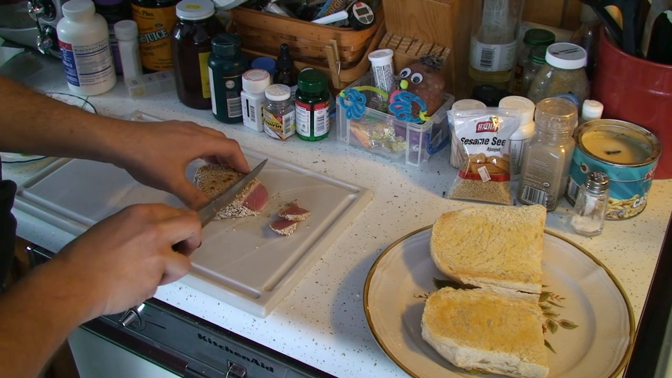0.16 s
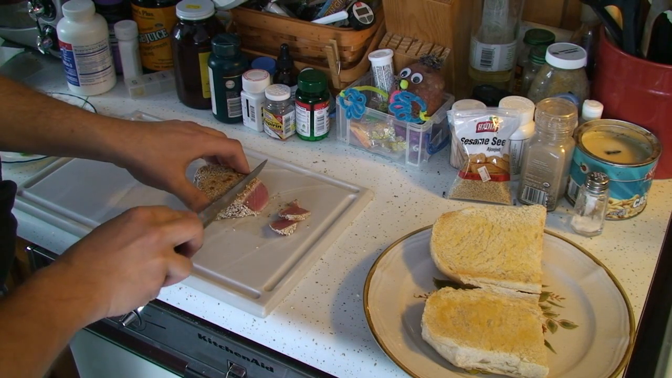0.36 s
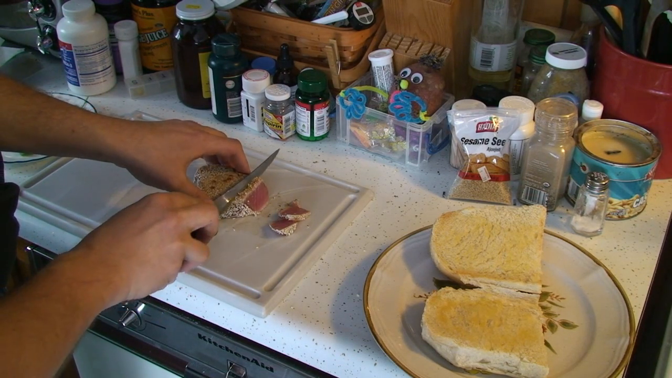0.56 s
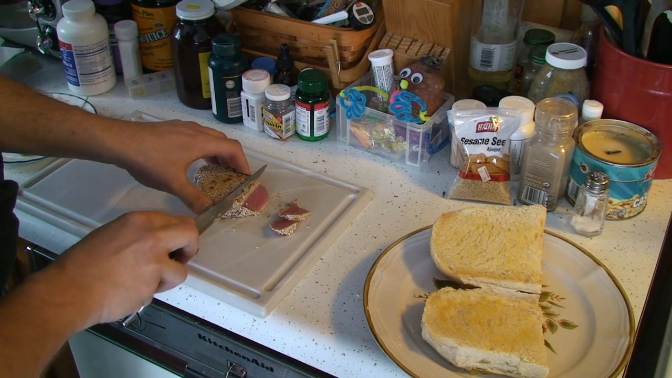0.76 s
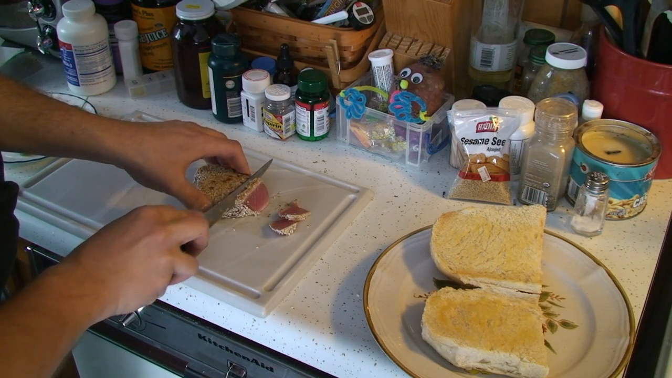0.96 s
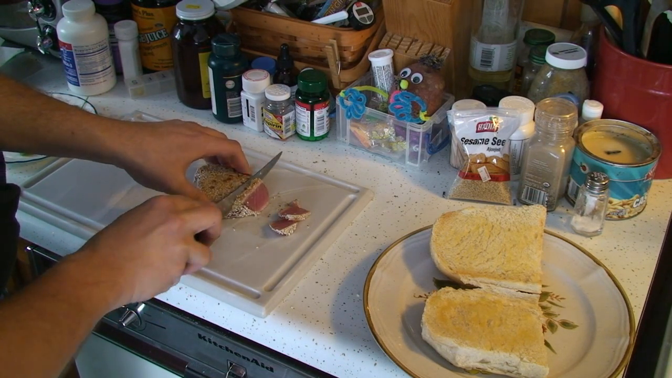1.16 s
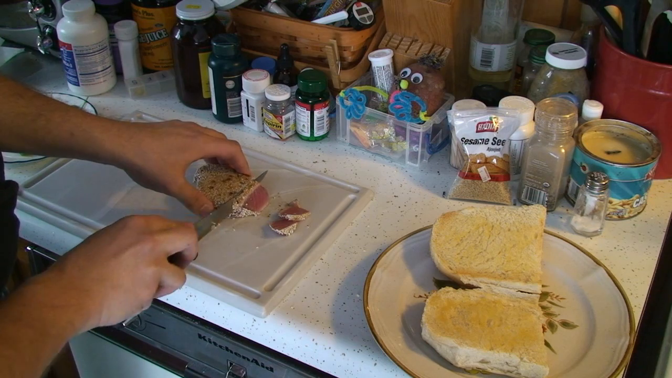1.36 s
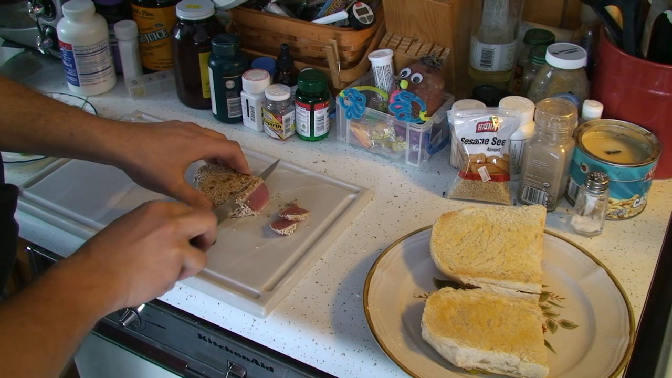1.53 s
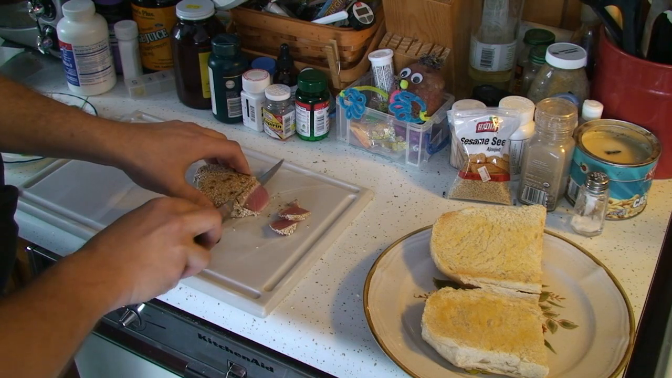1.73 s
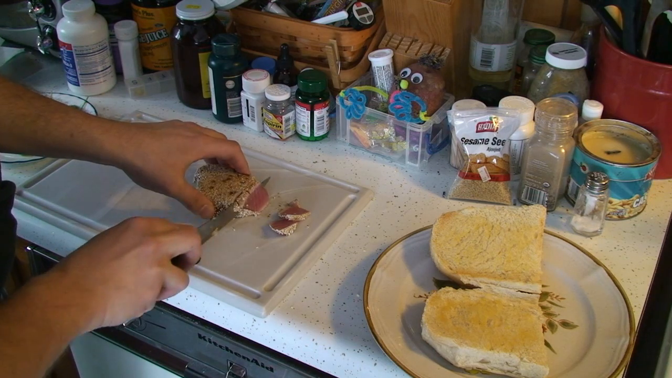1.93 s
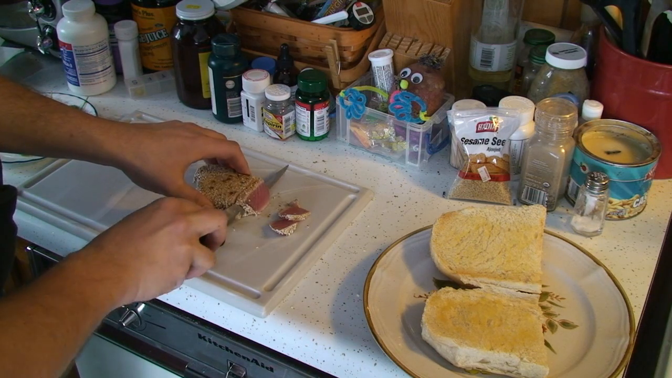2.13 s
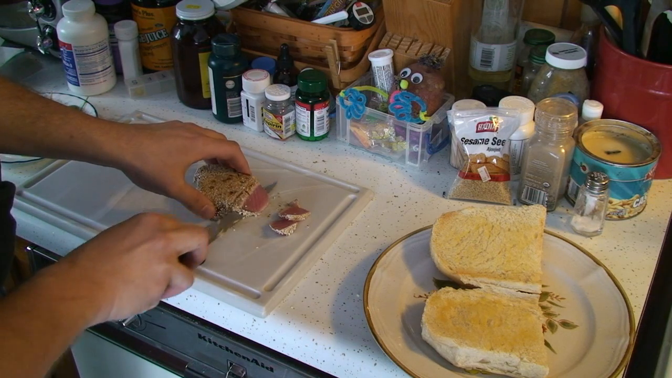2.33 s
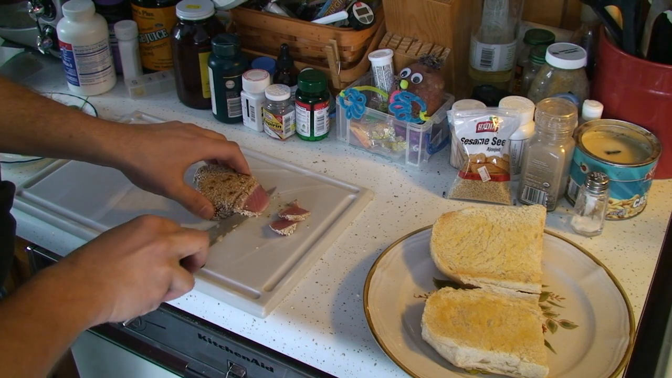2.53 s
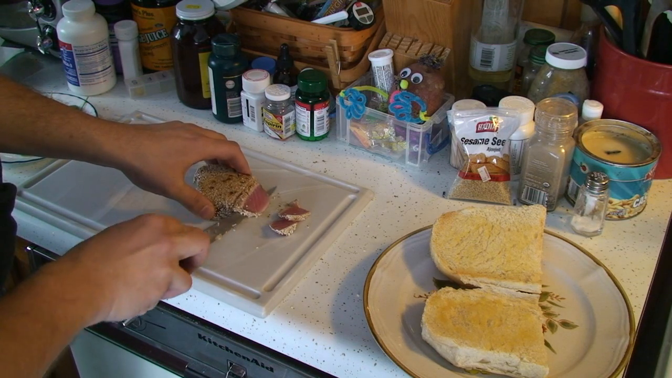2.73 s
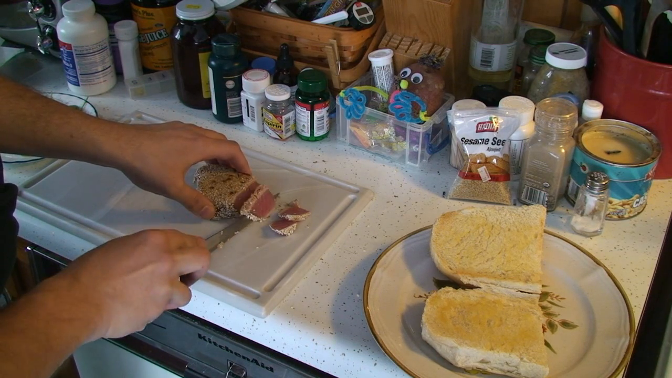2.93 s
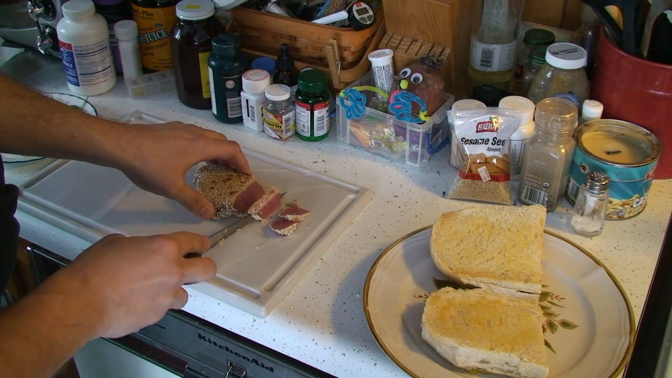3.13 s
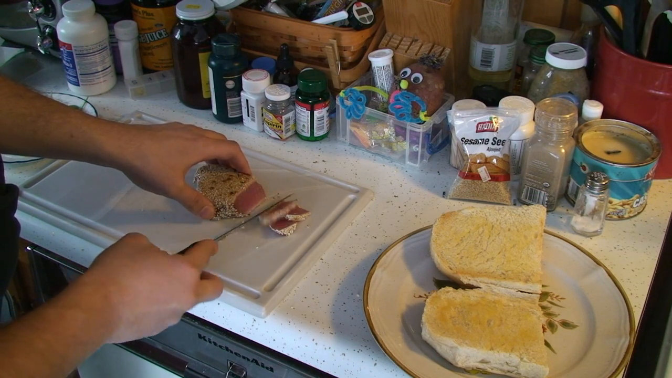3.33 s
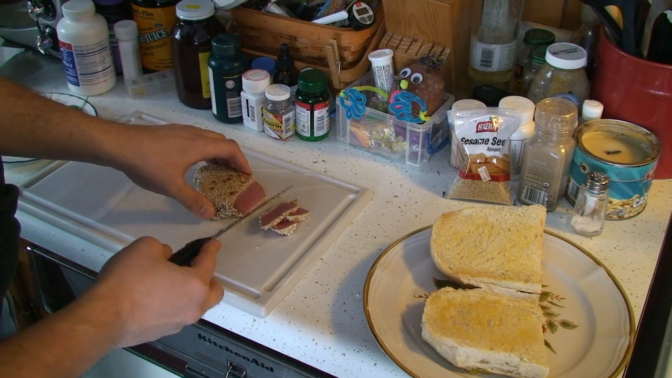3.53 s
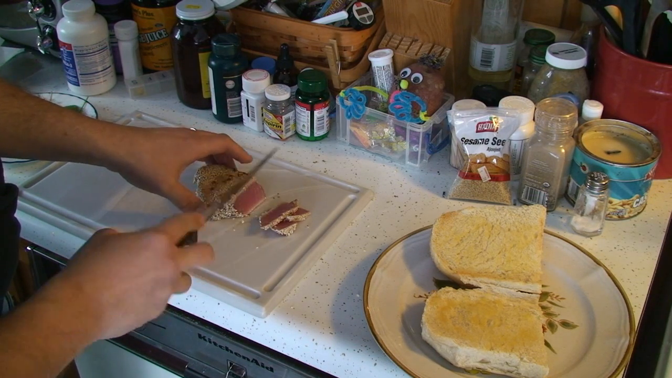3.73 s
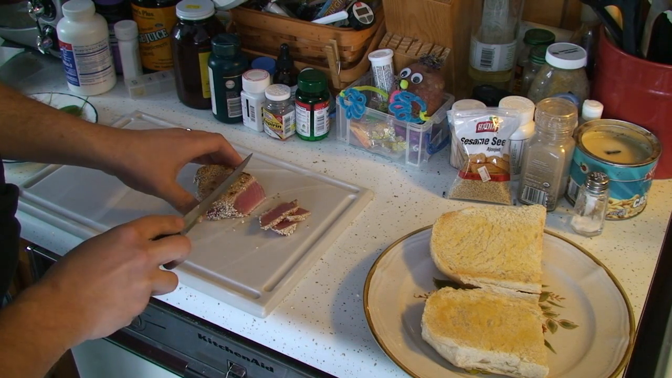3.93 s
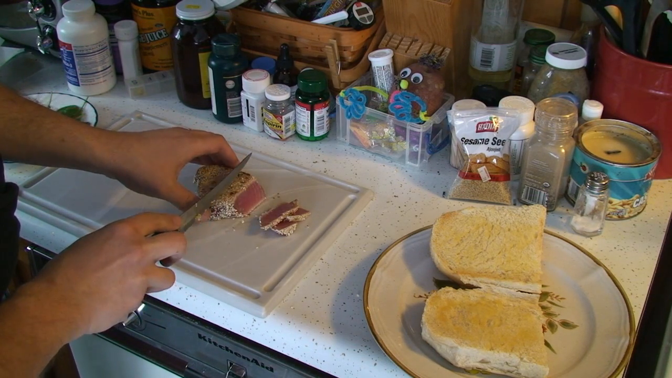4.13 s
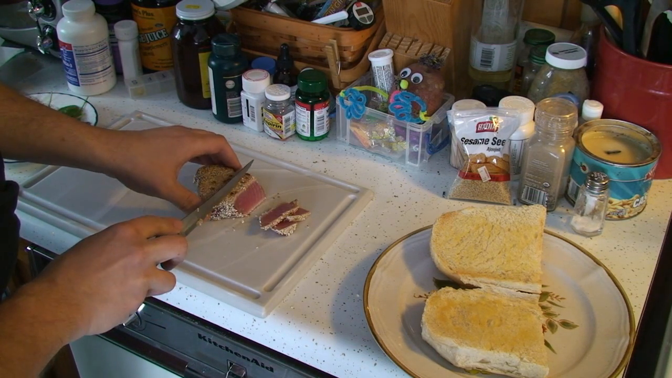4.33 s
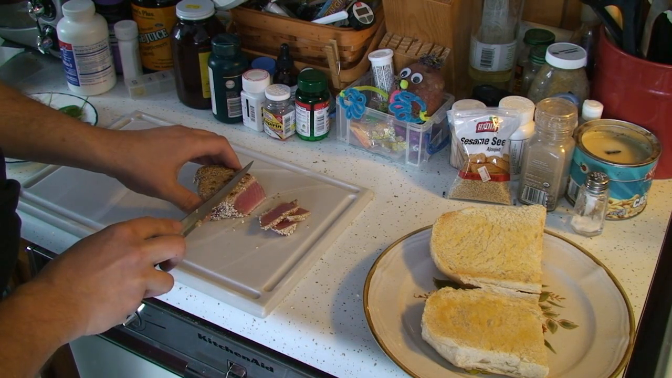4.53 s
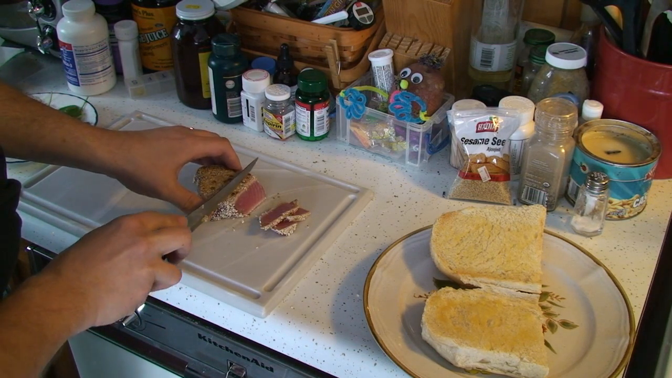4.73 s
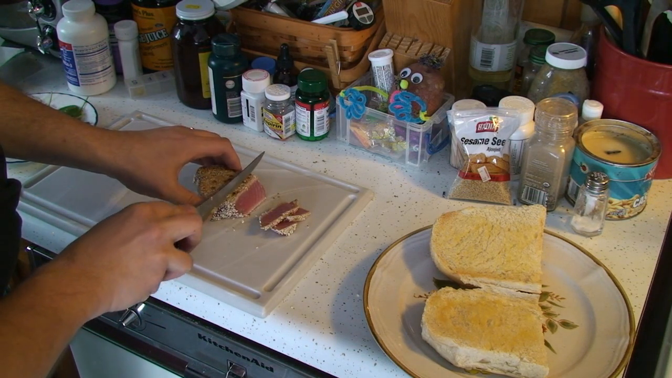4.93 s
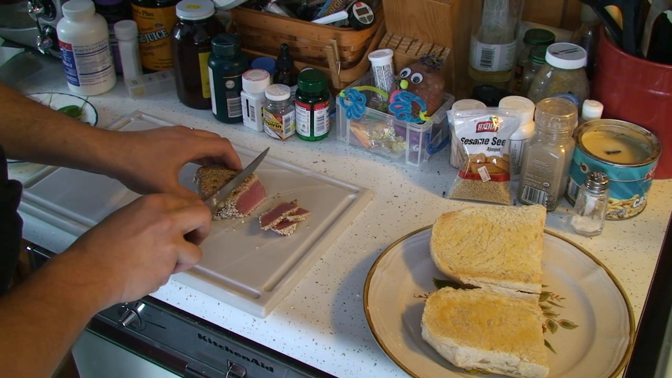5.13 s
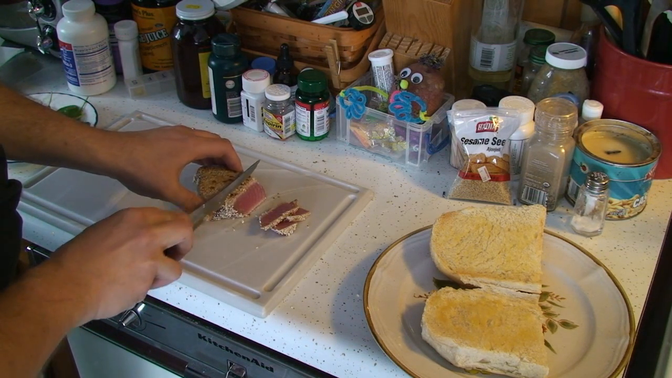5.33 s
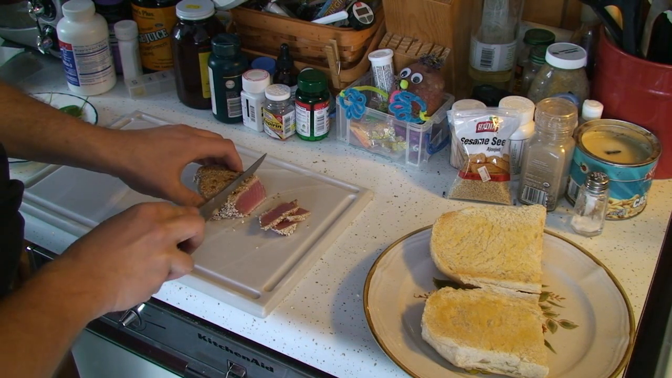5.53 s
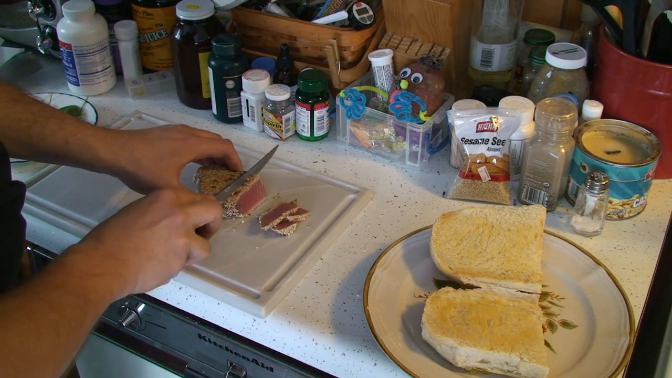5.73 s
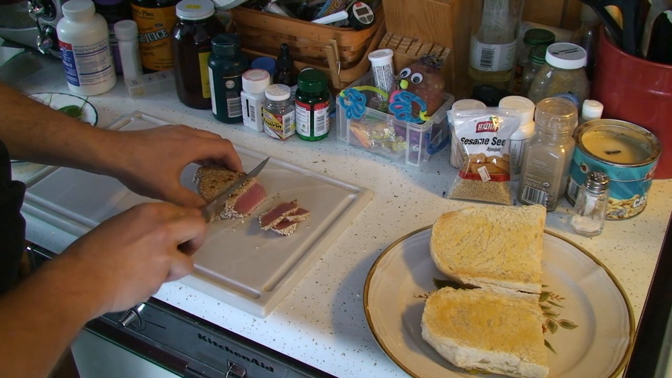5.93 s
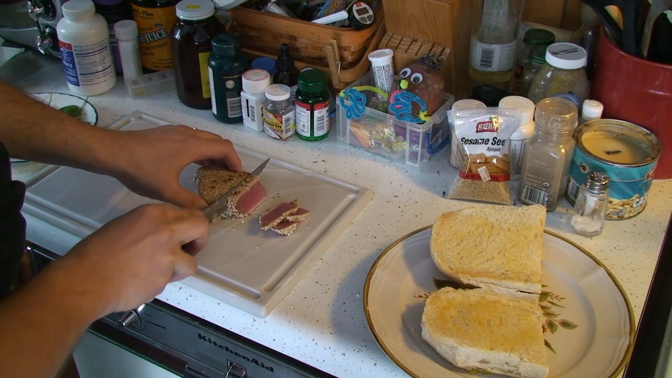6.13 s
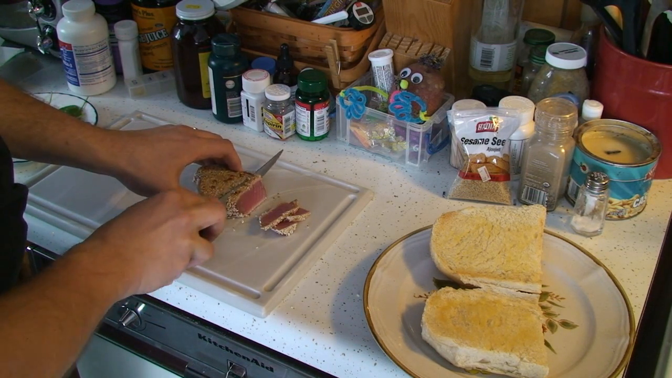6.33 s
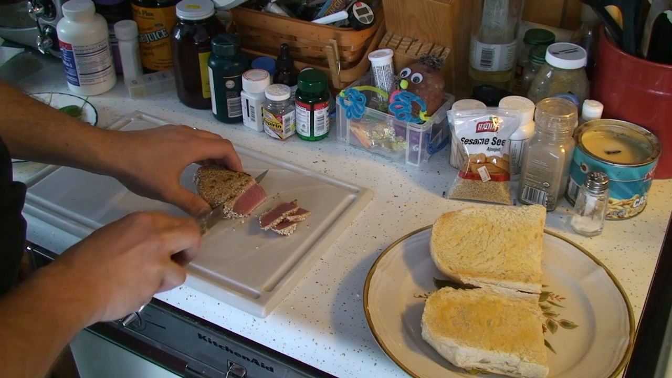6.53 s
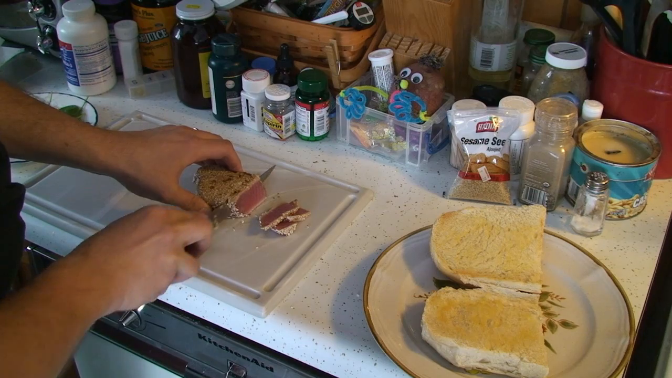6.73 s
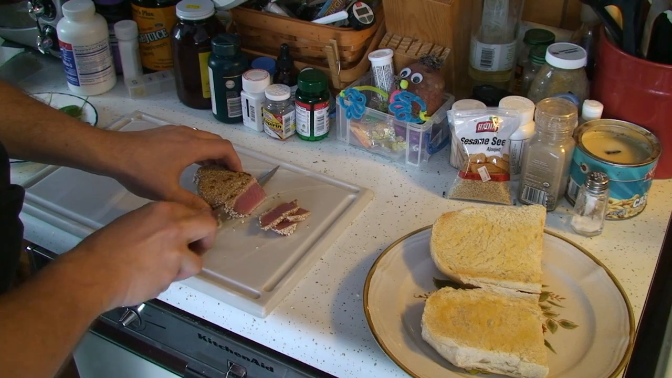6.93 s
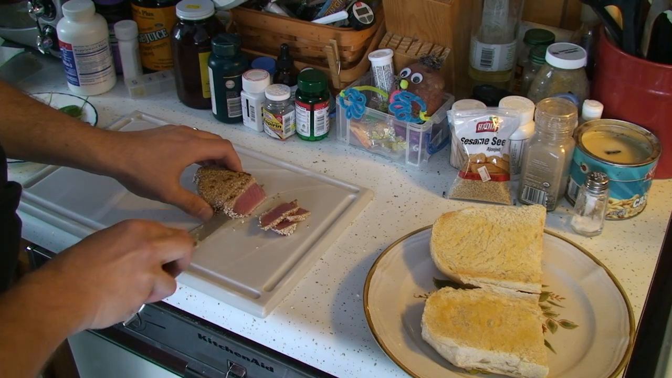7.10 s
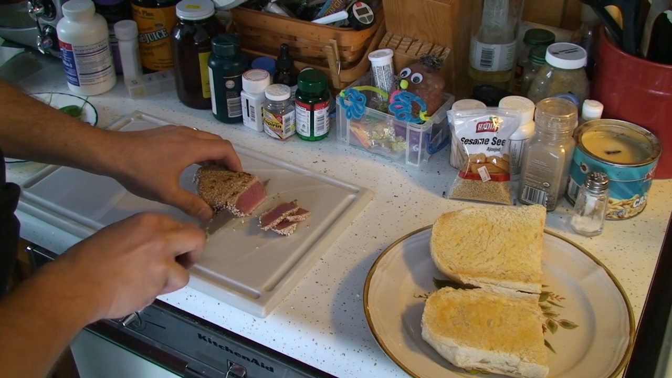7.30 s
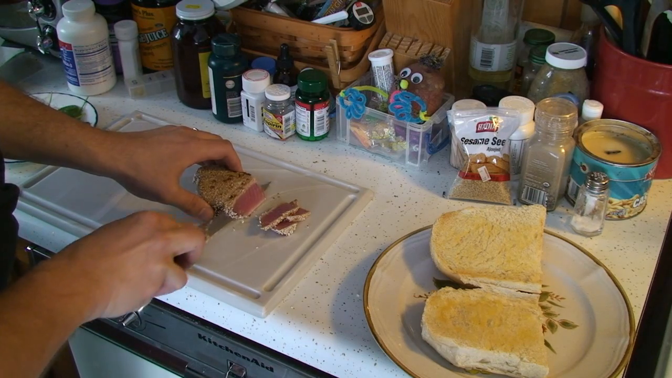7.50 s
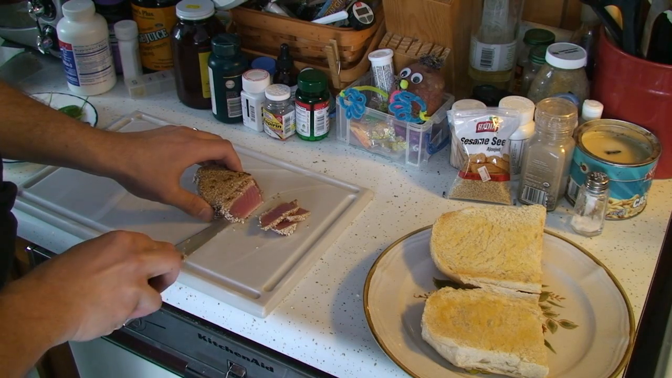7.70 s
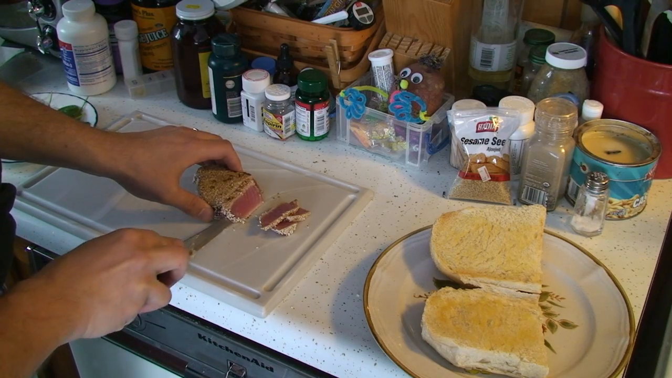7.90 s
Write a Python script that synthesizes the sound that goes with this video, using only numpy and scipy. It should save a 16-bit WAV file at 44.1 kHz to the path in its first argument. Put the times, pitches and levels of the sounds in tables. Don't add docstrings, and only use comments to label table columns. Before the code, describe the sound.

A small kitchen heard closely in stereo, with a faint steady refrigerator hum and wavering thin whine off to the right. From 0 to 2.2 seconds a knife saws through seared fish in soft, regular hisses, nearly four per second, with light knocks on a plastic board and a tiny falling squeak around 0.43. A scrape grows into a very loud, bright clack at 2.46, another knock at 2.59, then steely flicks and swishes until about 3. It quietens: a light tap at 3.6, low groans and faint chirps from the board's feet at 4.05 to 4.35, a barely audible tap at 4.6. Hissing strokes return softly, regular from 5.15, with modest knocks at 5.2, 5.9 and 6.4 and a short groan at 6.3. Firmer knocks at 6.87 and 7.3 lead to a loud ringing blow at 7.63 with a scrape and long metallic swish, then one last sweep near 7.9.

```python
import sys
import numpy as np
from scipy import signal
from scipy.fft import rfft, irfft
from scipy.io import wavfile
from scipy.ndimage import uniform_filter1d

SR = 44100
rng = np.random.default_rng(int(sys.argv[2]) if len(sys.argv) > 2 else 0)


def master(y):
    cut = np.clip(np.atleast_2d(y).T, -1, 1)
    pcm = np.round(cut * 32767)
    wavfile.write(sys.argv[1], SR, pcm.astype(np.int16))


def to_linear_factor(level_db):
    exponent = np.asarray(level_db, float) / 20
    return 10 ** exponent


N = 351036

# frequency in Hz, correlation.
LIKENESS = [(40, 0.42), (120, 0.033), (400, 0.057), (2000, 0.27), (6000, 0.12), (10000, 0.31), (15000, 1)]


def evened(x):
    return x / np.sqrt(np.mean(x ** 2) + 1e-20)


def peaked(x):
    return x / (abs(x).max() + 1e-20)


def smoothed(x, size):
    return uniform_filter1d(uniform_filter1d(x, size), size)


def read(points, hz):
    f, value = np.transpose(points)
    return np.interp(np.log(hz + 1), np.log(f + 1), value)


def add(mix, s, sound):
    part = mix[..., round(s * SR):][..., :sound.shape[-1]]
    part += sound[..., :part.shape[-1]]


def resonate(x, hz, width):
    return signal.lfilter(*signal.iirpeak(hz, hz / width, SR), x)


def ring(modes, shake_db, swell_cycles):
    hz, db, t60 = np.transpose(modes)[..., None]
    t = np.arange(0, min(t60.max(), 1 / 3), 1 / SR)
    swell = (1 - np.exp(-t * hz / swell_cycles)) ** 2
    level = to_linear_factor(db + shake_db[:, None] - 60 * t / t60)
    return (level * swell * np.sin(2 * np.pi * hz * t)).sum(0)


def noise(colour_db, likeness, patchy_db, lead=0):
    a, b, c, d, patches = rng.standard_normal((N // 256 + 5, 513, 5)).T
    patches = evened(uniform_filter1d(uniform_filter1d(patches, 10, 0), 10, 1))
    same = np.clip(likeness, -1, 1)[:, None]
    left = a + 1j * b
    right = same * left * np.exp(1j * lead) + np.sqrt(1 - same ** 2) * (c + 1j * d)
    z = np.array([left, right]) * to_linear_factor(colour_db[:, None] + patchy_db * patches)
    return evened(signal.istft(z, nperseg=1024, noverlap=768)[1][:, :N])


def grit(count, per_s, spread_db):
    size = to_linear_factor(spread_db * np.minimum(rng.exponential(1, count), 5))
    return evened(size * rng.standard_normal(count) * (rng.random(count) < per_s / SR))


def gesture(rise, fall, bulge):
    t = np.arange(0, rise + fall, 1 / SR)
    speed = np.clip(np.minimum(t / rise, (rise + fall - t) / fall), 0, 1)
    return np.sin(np.pi / 2 * speed) ** bulge


def fridge():
    # frequency in Hz, density in dB per Hz.
    air_colour = [(20, -1), (40, -9), (62, -7.5), (142, -15), (200, -8.5), (300, -9.5), (660, -7.5),
                  (873, -11.5), (1610, -16.5), (3250, -21), (5680, -26.5), (7310, -20), (14300, -37.5),
                  (16000, -34)]
    # frequency in Hz, rms level in dB.
    hum_lines = [(60, -69), (120, -98), (180, -82), (240, -57.5), (360, -93), (3294, -68.5), (4665, -76.5),
                 (6045, -75.5), (6390, -72.5), (6490, -75), (6620, -81.5)]
    # frequency in Hz, width in Hz, rms level in dB.
    whine_bands = [(453.3, 28, -63.5), (655, 114, -63), (3220, 30, -75), (6310, 92, -73), (7320, 100, -74),
                   (7800, 110, -93)]
    # frequency in Hz, left minus right in dB.
    sides = [(60, -1.5), (240, -1.5), (950, -1), (3770, -1.0), (15000, -2.0)]
    hz, t = np.fft.rfftfreq(1024, 1 / SR), np.arange(N) / SR
    lead = 4 * np.pi * np.minimum(hz / 6300, 1)[:, None]
    air = to_linear_factor(-51) * noise(read(air_colour, hz), read(LIKENESS, hz), patchy_db=0.8, lead=lead)

    waver = evened(smoothed(rng.standard_normal(N), 3000))
    hum = np.zeros(N)
    for f, db in hum_lines:
        level = to_linear_factor(db + 2.23 * waver * (f > 1000))
        hum += level * np.sqrt(2) * np.sin(2 * np.pi * (f * t + rng.random()))

    drive = rng.standard_normal((2, N))
    drive[1] = np.cos(.8) * drive[0] + np.sin(.8) * drive[1]
    whine = sum(to_linear_factor(db) * evened(resonate(resonate(drive, f, w), f, w)) for f, w, db in whine_bands)

    lean_db = read(sides, np.fft.rfftfreq(N, 1 / SR)) * np.array([[.5], [-.5]])
    return irfft(rfft(air + whine + hum) * to_linear_factor(lean_db), N)


def saw():
    # frequency in Hz, density in dB per Hz.
    hiss_colour = [(710, -28), (1200, 7), (1290, -3.5), (2830, -5), (3320, -4.5), (4260, -5), (6440, -3.5),
                   (9510, -6), (14700, -26), (16000, -36)]
    # start in seconds, rise in seconds, fall in seconds, peak in dB.
    strokes = [(0.08, 0.18, 0.1, -59.5), (0.36, .15, 0.12, -58.5), (0.65, .16, 0.16, -59.5),
               (0.92, 0.16, .14, -58.5), (1.2, 0.15, .13, -59.5), (1.46, 0.14, .14, -57.5),
               (1.73, 0.15, 0.17, -58), (1.98, 0.13, 0.19, -59), (2.24, 0.22, 0.079, -55.5),
               (2.53, .1, 0.071, -51.5), (2.74, 0.054, 0.2, -59), (4.66, 0.11, 0.67, -63.5),
               (5.15, 0.23, 0.11, -60.5), (5.44, 0.13, 0.48, -61), (5.84, 0.19, 0.11, -58.5),
               (6.12, .14, .14, -57.5), (6.4, 0.18, 0.11, -58), (6.68, 0.14, .12, -57.5),
               (6.94, 0.2, 0.12, -58), (7.25, .09, 0.18, -59.5), (7.42, 0.16, .1, -59),
               (7.56, 0.091, 0.19, -49.5), (7.84, 0.15, .1, -56.5)]
    hz = np.fft.rfftfreq(1024, 1 / SR)
    hiss = noise(read(hiss_colour, hz), read(LIKENESS, hz) + 0.12, patchy_db=.6)
    crackle = resonate(resonate(grit(N, 900, 2.8), 8200, 7000), 8200, 9000)
    power = np.full(N, to_linear_factor(-69) ** 2)
    for start, rise, fall, db in strokes:
        add(power, start, (to_linear_factor(db) * gesture(rise, fall, bulge=1.21)) ** 2)
    return to_linear_factor(4.5) * np.sqrt(power) * (hiss + 0.4 * evened(crackle))


def knocks():
    # time in seconds, middle modes in dB, low bending in dB, upper modes in dB,
    # counter thump in dB.
    blows = [(0.105, -38, -40, -54, -54), (0.65, -32, -36, -50, -45), (0.682, -21, -33, -35, -56),
             (1.181, -31, -31, -48.5, -40.5), (1.266, -23, -32, -35.5, -46.5),
             (1.704, -66, -36.5, -62, -46.5), (1.794, -24, -32.5, -39, -49), (2.171, -22, -28, -20.5, -50),
             (2.458, -8.5, -28.5, -17, -44.5), (2.588, -13, -29, -24, -44), (3.639, -25.5, -31.5, -37, -47),
             (4.615, -53, -53, -58, -57), (5.221, -25.5, -32.5, -35.5, -47.5), (5.825, -33, -51, -65, -42),
             (5.882, -26.5, -34.5, -37.5, -58), (6.439, -31.5, -39, -44, -52),
             (6.867, -23, -28.5, -31.5, -43), (7.283, -21, -29, -21.5, -49),
             (7.333, -15.5, -26.5, -22, -40), (7.516, -57, -38, -50.5, -57),
             (7.633, -10.5, -23.5, -13, -37.5), (7.934, -63, -57, -47, -45.5)]
    # frequency in Hz, level in dB, t60 in seconds.
    board_modes = [(214, 1.5, 0.11), (277, -2, 0.079), (415, 9, 0.16), (442.6, 7.5, 0.14),
                   (480, -37, 0.046), (582, -6, 0.17), (713, -4.5, 0.06), (754, -3.5, 0.042),
                   (798.4, 9.5, 0.1), (810, -22, 0.017), (935, 7.5, 0.03), (1033, 9.5, 0.068),
                   (1240, -12, 0.0077), (1086, 2.5, 0.08), (1303, 6.5, 0.099), (1410, 4.5, 0.11),
                   (1356, 5.5, 0.056), (1526, 15.5, 0.047), (1772, 7, 0.053), (1814, -1, 0.052),
                   (1910, 13, 0.014), (2140, 5, 0.033), (1990, 0, 0.036), (2410, 0, 0.038),
                   (2570, -2.5, 0.034), (2670, -11.5, 0.009), (2800, -15, 0.02), (3035, -1, 0.03),
                   (3330, -23, 0.011), (4320, -7, 0.0082)]
    # frequency in Hz, level in dB, t60 in seconds.
    counter_modes = [(39, -9.5, 0.51), (64.2, -6.5, 0.46), (93, 3, 0.19), (120.7, 7.5, 0.083)]
    # delay in ms, factor.
    slap_backs = [(4.6, 0.51), (7.0, -1.31), (10.0, -0.79), (13, 0.28), (17.5, 0.17), (23, -0.11),
                  (30, -0.47)]
    out, hz = np.zeros(N), np.transpose(board_modes)[0]
    delay_ms, factor = np.transpose(slap_backs)
    held = np.array(board_modes)
    held[:, 2] *= np.interp(hz, (500, 600), (.6, .45))
    luck = rng.standard_normal((len(blows), len(hz) + 2 * len(delay_ms)))

    rattle, rattle_s = .5, .012
    chatter = evened(smoothed(rng.standard_normal((len(blows), SR // 2)), 60))
    chatter = 1 + rattle * chatter * (1 - np.exp(-np.arange(SR // 2) / (rattle_s * SR)))

    for (s, mid_db, low_db, upper_db, thump_db), row, loose in zip(blows, luck, chatter):
        place, late, strong = np.split(row, (len(hz), len(hz) + len(delay_ms)))
        slaps = np.zeros(SR // 20)
        at = (delay_ms * (1 + .015 * late) * SR / 1000).astype(int)
        slaps[at] = factor * (1 + .12 * strong)
        soft = held * (1, 1, np.interp(mid_db, (-28, -14), (.65, 1.0)))
        fading = np.exp(-np.arange(len(slaps)) / SR * np.interp(mid_db, (-28, -14), (40, 1)))

        bright_db = 1.14 * upper_db + 1
        blow = [(420, low_db - 4.5), (730, mid_db - 6.5), (1350, upper_db - 13.0), (2900, bright_db - 3.5)]
        blow_db = read(blow, hz) + 2.7 * place
        edge_db = blow_db + read([(400, -8), (750, -4), (1200, 5.5), (3000, 6)], hz)
        edge = ring(soft, edge_db, swell_cycles=1.0)
        edge = edge * loose[:len(edge)]
        add(out, s - .0006, edge)
        add(out, s + 0.001682, -.6 * edge)

        slap = ring(soft, blow_db + read([(1200, 0.0), (3000, -1.0)], hz), swell_cycles=0.82)
        slap = signal.fftconvolve(slap, slaps * fading)
        slap_db = np.interp(mid_db, (-24, -14), (-3, 2.5))
        add(out, s - .0018, to_linear_factor(slap_db) * slap * loose[:len(slap)])

        thump = peaked(ring(counter_modes, 0.84 * place[:4], swell_cycles=0.35))
        add(out, s, to_linear_factor(thump_db + 2.5) * thump)
    return out


def ticks():
    # time in seconds, peak in dB, centre in Hz.
    cracks = [(0.4277, -43, 9600), (0.69, -38, 9500), (0.974, -48, 13500), (1.9084, -43, 8250),
              (2.0368, -45, 7000), (2.171, -42, 4710), (2.2597, -46, 9800), (2.3156, -36, 7360),
              (2.4574, -28.5, 5240), (2.5596, -49, 7030), (2.7475, -38, 5760), (2.7616, -37, 6300),
              (2.7914, -34.5, 6760), (2.9085, -41, 6320), (5.4783, -47, 7770), (5.5333, -46, 7200),
              (6.6517, -39.5, 9700), (7.2838, -38, 5000), (7.334, -38, 5590), (7.5946, -34, 5200),
              (7.633, -20.5, 5040)]
    out, t = np.zeros(N), np.arange(400) / SR
    for s, db, hz in cracks:
        burst = rng.standard_normal(400) * np.exp(-t / 0.0021)
        add(out, s, to_linear_factor(db + 3) * peaked(resonate(resonate(burst, hz, 2500), hz, 4000)))
    return out


def squeaks():
    # time in seconds, length in seconds, start pitch in Hz, end pitch in Hz, peak in dB.
    slips = [
        (0.434, 0.019, 1694, 1140, -44),
        (0.451, 0.024, 1097, 890, -45.5),
        (4.054, 0.029, 461, 438, -48),
        (4.083, 0.03, 480, 480, -50),
        (4.303, 0.03, 648, 630, -57),
        (4.337, .016, 1100, 1050, -49.5),
        (6.301, 0.037, 611, 586, -43.5),
        (6.35, .008, 1640, 1580, -47.5),
        (6.366, 0.042, 680, 660, -53),
    ]
    # pitch in Hz, second harmonic in dB.
    overtone = [(470, 9.5), (630, -7.5), (1100, -33), (1650, -24)]
    out = np.zeros(N)
    for s, length, start_hz, end_hz, db in slips:
        u = np.linspace(0, 1, round(length * SR))
        rough = evened(uniform_filter1d(rng.standard_normal(2000), 60))[:len(u)]
        pitch = start_hz * (end_hz / start_hz) ** u * (1 + .015 * rough)
        turn = 2 * np.pi * np.cumsum(pitch) / SR
        harmonics = np.sin(2 * turn) + 0.18 * np.sin(3 * turn) + 0.12 * np.sin(4 * turn)
        tone = np.sin(turn) + to_linear_factor(read(overtone, start_hz)) * harmonics
        add(out, s, to_linear_factor(db) * tone * (1 + 0.64 * rough) * signal.windows.tukey(len(u), .6))
    return out


def drags():
    # start in seconds, rise in seconds, fall in seconds, board in dB, blade in dB.
    scrapes = [
        (2.265, 0.18, 0.021, -35.5, -49.5),
        (2.785, 0.013, 0.18, -52.5, -51.5),
        (6.36, 0.018, 0.047, -51, -75),
        (6.956, 0.034, 0.042, -41, -55),
        (7.508, .012, 0.083, -45.5, -62),
        (7.591, .008, .07, -35, -42.5),
        (7.88, 0.084, 0.035, -55, -51.5),
    ]
    # frequency in Hz, width in Hz, level in dB.
    board_bands = [(425, 70, -5), (740, 110, 0), (880, 90, -6), (1140, 130, -4), (1480, 120, -9),
                   (1750, 250, -11)]
    # frequency in Hz, width in Hz, level in dB.
    blade_bands = [(1640, 450, 1.5), (2330, 350, -2), (3220, 370, 0), (3950, 500, -8)]
    out = np.zeros(N)
    for start, rise, fall, board_db, blade_db in scrapes:
        slips = grit(SR // 4, 12000, 1.5)
        board = sum(to_linear_factor(db) * evened(resonate(resonate(slips, f, w), f, 2 * w)) for f, w, db in board_bands)
        blade = sum(to_linear_factor(db) * resonate(resonate(slips, f, w), f, w) for f, w, db in blade_bands)
        rub = to_linear_factor(board_db) * evened(board) + to_linear_factor(blade_db) * evened(blade)
        push = gesture(rise, fall, bulge=0.72)[:SR // 4]
        add(out, start, push * rub[-len(push):])
    return out


def sweeps():
    # start in seconds, rise in seconds, fall in seconds, steel in dB, tip ring in dB.
    strokes = [
        (2.307, 0.0092, 0.069, -49, -59),
        (2.359, 0.13, 0.02, -58, -67),
        (2.55, 0.048, 0.093, -45, -51),
        (2.734, 0.026, 0.014, -54, -54),
        (2.787, 0.014, 0.019, -45, -53),
        (2.8, .11, 0.032, -52, -52),
        (7.59, 0.012, 0.22, -40, -50),
        (7.88, .08, 0.034, -43.5, -55),
    ]
    # frequency in Hz, width in Hz, level in dB.
    steel_bands = [(4750, 160, 3), (5300, 300, -2), (7150, 300, -1), (8500, 900, -6), (9900, 700, -5)]
    out = np.zeros(N)
    for start, rise, fall, steel_db, tip_db in strokes:
        slips = grit(SR // 3, 3000, 1.0)
        steel = sum(to_linear_factor(db) * resonate(resonate(slips, f, w), f, 2.2 * w) for f, w, db in steel_bands)
        tip = resonate(resonate(slips, 6500, 250), 5860, 500)
        swish = to_linear_factor(steel_db - 6.5) * evened(steel) + to_linear_factor(tip_db) * evened(tip)
        push = gesture(rise, fall, bulge=1)[:SR // 3]
        add(out, start, push * swish[-len(push):])
    return out


def kitchen(x):
    # frequency in Hz, t60 in seconds.
    decay = [(100, 0.61), (500, 0.15), (2000, 0.24), (8000, 0.17)]
    taps = np.zeros((2, SR // 2))
    at = np.arange(400, SR // 2 - 20, 20) + rng.integers(0, 20, (2, (SR // 2 - 401) // 20))
    np.put_along_axis(taps, at, rng.choice([-1., 1.], at.shape), 1)
    taps[1] = np.cos(.9) * taps[0] + np.sin(.9) * taps[1]
    hz, t, z = signal.stft(taps, SR, nperseg=256)
    z[1, hz < 200] = z[0, hz < 200]
    fade_db = -60 * t / read(decay, hz)[:, None]
    tail = signal.istft(z * to_linear_factor(fade_db), SR, nperseg=256)[1]
    return signal.fftconvolve(x[None], tail / np.linalg.norm(tail[0]), axes=1)[:, :N]


def scene():
    board = knocks() + ticks() + drags() + sweeps() + squeaks()
    return board * to_linear_factor([[.2], [-.2]]) + to_linear_factor(-8) * kitchen(board) + saw() + fridge()


def top_cut(x):
    return signal.sosfilt(signal.butter(12, 16470, fs=SR, output="sos"), x)


def record(dry):
    low_pass = signal.firwin(767, 15200, window=("kaiser", 8), fs=SR)
    limited = signal.oaconvolve(np.clip(dry, -1, 1), low_pass[None], "same")
    return top_cut(limited)


dry = scene()
out = record(dry)
master(out)
```